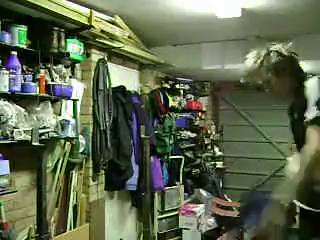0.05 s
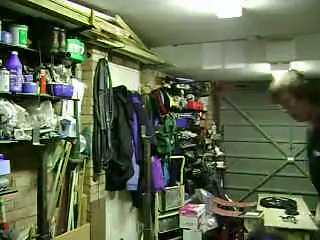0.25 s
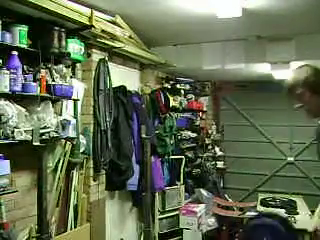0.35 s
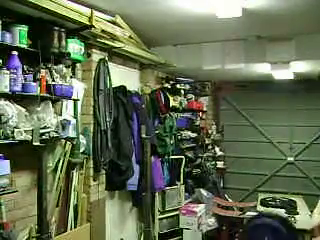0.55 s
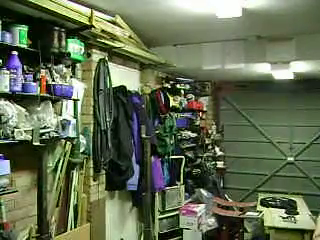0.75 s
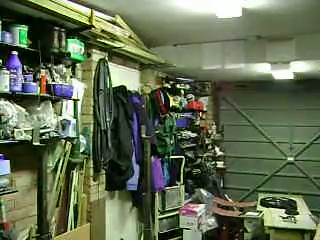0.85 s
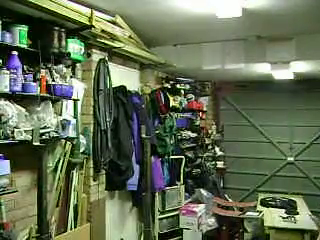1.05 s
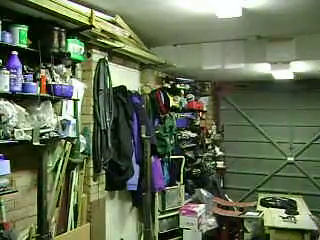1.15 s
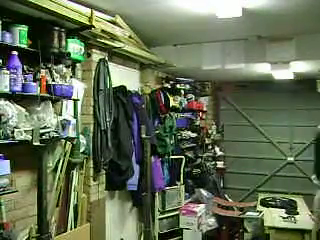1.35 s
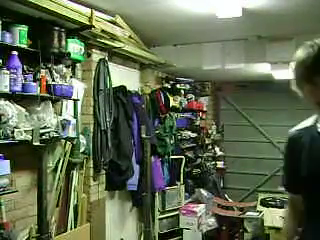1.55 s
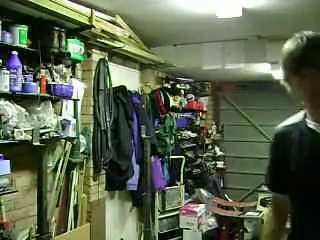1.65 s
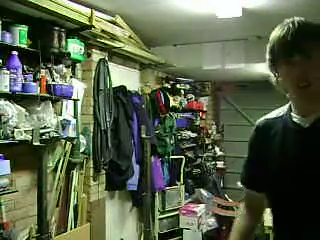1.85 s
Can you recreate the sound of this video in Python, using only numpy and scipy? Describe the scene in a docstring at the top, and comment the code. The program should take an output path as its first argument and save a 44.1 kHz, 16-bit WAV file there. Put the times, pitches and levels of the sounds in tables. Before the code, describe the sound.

A dropped barbell lands with a deep thud and a clatter of loose plates, crashes again as it bounces, and rattles to rest. The small garage adds a short echo, and the microphone overloads on the hardest hits.

```python
"""Faint air and electric hum in a small garage. Loose plates rattle on a loaded barbell's steel sleeves.
At 0.2 s the dropped bar lands: the floor thuds and booms, the plates knock, clatter and clank.
It bounces at 0.8 s, then more lightly until 1.4 s; the rattle dies out by about 1.7 s.
The room adds a short echo to the plates. The hardest crashes clip; treble is cut above about 5.5 kHz."""
import sys
import numpy as np
from scipy import signal
from scipy.fft import rfft, irfft, next_fast_len
from scipy.io import wavfile

SR = 44100
rng = np.random.default_rng(int(sys.argv[2]) if len(sys.argv) > 2 else 0)


def dump_mix(stems):
    """Bounce the given channels to the path in sys.argv[1] as a 16-bit WAV at rate SR."""
    frames = np.atleast_2d(stems).T  # one column per channel
    limited = np.clip(frames, -1, 1)  # hard clip at full scale
    pcm = np.round(limited * 32767).astype(np.int16)
    wavfile.write(sys.argv[1], SR, pcm)


N = 83790

# air spectrum: freq_hz, level_db
AIR_SPECTRUM = [(25, 11.5), (100, -5.5), (300, -6.5), (600, -10.5), (1700, -11), (2500, -23.5), (5300, -21)]
# electric hum: pitch_hz, rms_db
HUM_TONES = [(101, -50), (344.5, -53)]
# spells of plates shaking on the sleeves: start_s, hold_s, force_db, ring_offset_db
SHAKE_SPELLS = [(0, .03, -35, -6), (0.041, 0.14, -29.5, 3.5), (0.204, 0.11, -2, -6.5), (0.267, 0.1, 0, 1),
                (0.428, 0.042, -13, 2), (0.499, 0.096, -17, -1), (0.642, 0.061, -18.5, 4.5),
                (0.778, 0.022, -21, 4.5), (0.812, .05, -4, -5.5), (0.858, 0.064, -5.5, 2),
                (1.0, 0.12, -19.5, -3), (1.12, 0.12, -17.5, -3.5), (1.224, 0.05, -10, -1),
                (1.279, 0.062, -8, 0.5), (1.386, 0.098, -12.5, 2), (1.53, .12, -22, -1)]
# crack of a steel contact: freq_hz, level_db
CRACK_SPECTRUM = [(40, -12.5), (150, -4.5), (400, -4.5), (700, -2.5), (1000, 1.5), (1600, -5), (2500, 0.5),
                  (3500, -2.5), (5200, -3), (7000, -5)]
# bar and plate modes: pitch_hz, energy_db, t60_s
STEEL_MODES = [(847, -20.5, 0.028), (1072.4, -12.5, 0.047), (1137, -10, 0.034), (1214, -12, 0.042),
               (1515, -17.5, 0.14), (2119, -15, 0.033), (2844, -8.5, 0.046), (2983.6, -5.5, 0.051),
               (2958, -13, 0.26), (3042.6, -6.5, 0.052), (3407, -23, 0.12), (3804, -17.5, 0.047),
               (4690, -22, 0.022), (5283, -12, 0.071)]
# plate slams on collar: start_s, force_db
COLLAR_HITS = [(0.0425, -24), (.051, -25.5), (0.1352, -24), (.144, -19.5), (0.1738, -35), (0.2085, 9),
               (0.5335, -30), (0.5556, -17.5), (.574, -12.5), (0.5809, -7), (.61, -16.5), (0.6716, -27),
               (0.7089, -23.5), (.8121, -1), (0.8638, 15), (.922, -8), (.968, -14), (1.039, -22.5),
               (1.073, -17.5), (1.1074, -10.5), (1.1271, -8.5), (1.137, -12.5), (1.1584, -16.5),
               (1.171, -14), (1.2222, -1), (1.324, -3.5), (1.4008, -4.5), (1.4237, -9), (1.479, -18),
               (1.501, -11.5), (1.509, -11.5), (1.524, -11.5), (1.5452, -11.5), (1.6148, -17.5)]
# weights hit the floor: start_s, thud_db, boom_db, knock_db
FLOOR_HITS = [(.208, -2.5, 8.5, 7.5), (.805, -13.5, -20, -4), (.83, -11, -18.5, 2), (1.062, -30, -30, -16),
              (1.2185, -16.5, -25.5, -2.5), (1.254, -34, -31, -17), (1.425, -21, -34, -23)]
# low modes of floor and room: pitch_hz, level_db, t60_s
THUD_MODES = [(39.2, -6, 0.4), (69.7, 4.5, 0.34), (95.4, -5, 0.2), (130.2, -16.5, 0.66)]
# floor boom noise: freq_hz, level_db
BOOM_SPECTRUM = [(25, 4.5), (60, 2), (125, 0), (180, -3), (240, -1), (350, -4), (600, -5), (2000, -26)]
# floor panel modes: pitch_hz, level_db, t60_s
PANEL_MODES = [(38.3, -5.5, .4), (129.6, -8, 0.34), (224.9, -1.5, 0.24), (258, -1, 0.19)]
# hollow knock of plates on the floor: pitch_hz, level_db, t60_s
KNOCK_MODES = [(528, -6.5, 0.071), (635, 5.5, 0.022), (800, 4, 0.027), (1022, 0.5, 0.04), (1251, 1, 0.037)]
# lo-fi passband: freq_hz, gain_db
PASSBAND = [(20, -8.5), (40, 0.5), (5200, 0.5), (5600, -7.5), (5900, -9.5), (6200, -40), (6600, -70)]

AIR_RMS_DB = -42.5
ROOM_DELAY_S, ROOM_ATTACK_S, ROOM_T60_S = 0.0037, 0.0022, 0.26
CRACK_DB, CRACK_ATTACK_S, CRACK_T60_S = 2.5, 0.00085, 0.028
CRACK_DB_PER_FORCE_DB = 1.11  # harder contacts: more crack relative to ring
RING_DB, RING_SPREAD_DB, DETUNE_RATIO = -3.5, 0.56, 0.005
SHAKE_RISE_S, SHAKE_FALL_DB_PER_S = 0.011, 286
CONTACTS_PER_S, CONTACT_SPREAD_DB = 480, 3
THUD_ATTACK_S, KNOCK_ATTACK_S = 0.016, 0.0021
BOOM_ATTACK_S, BOOM_T60_S, PANEL_DB = 0.014, 0.27, -1
INPUT_LIMIT, OUTPUT_KNEE, OUTPUT_LIMIT, CUTOFF_HZ = 0.79, 0.57, 0.69, 15850


def amp(db):
    """Decibels to gain."""
    return 10 ** (np.asarray(db) / 20)


def unit_rms(x):
    """Scale to rms 1."""
    return x / np.sqrt(np.mean(x ** 2) + 1e-20)


def unit_energy(x):
    """Scale to energy 1."""
    return x / np.sqrt(np.sum(x ** 2) + 1e-20)


def filtered(x, response):
    """Apply the gain response(hz)."""
    size = next_fast_len(len(x) + 8192)
    return irfft(rfft(x, size) * response(np.fft.rfftfreq(size, 1 / SR)), size)[:len(x)]


def coloured(x, spectrum):
    """Apply (freq_hz, gain_db) points on a log frequency axis."""
    freq_hz, gain_db = np.transpose(spectrum)
    return filtered(x, lambda hz: amp(np.interp(np.log(hz + 1), np.log(freq_hz + 1), gain_db)))


def noise(spectrum, size):
    """Coloured noise, rms 1."""
    return unit_rms(coloured(rng.standard_normal(size), spectrum))


def struck(t, attack_s, t60_s):
    """Envelope of a blow at t = 0."""
    t = np.maximum(t, 0)
    return (1 - np.exp(-t / attack_s)) * amp(-60 * t / t60_s)


def room_tone():
    """Faint air and electric hum."""
    t = np.arange(N) / SR
    hum = sum(amp(db) * np.sqrt(2) * np.sin(2 * np.pi * hz * t) for hz, db in HUM_TONES)
    return amp(AIR_RMS_DB) * noise(AIR_SPECTRUM, N) + hum


def steel_ring(t):
    """Decaying modes of bar and plate; pitch and level vary from plate to plate."""
    out = np.zeros(len(t))
    for hz, db, t60_s in STEEL_MODES:
        detune, spread, phase = rng.standard_normal(3)
        partial = np.sin(2 * np.pi * (hz * (1 + DETUNE_RATIO * detune) * t + phase))
        out += amp(db - RING_SPREAD_DB * spread) * unit_energy(partial * amp(-60 * t / t60_s))
    return out


def garage_echo(x, wet_db):
    """Direct sound plus the short, diffuse echo of a cluttered room."""
    t = np.arange(SR // 2) / SR
    envelope = struck(t - ROOM_DELAY_S, ROOM_ATTACK_S, ROOM_T60_S)
    tail = unit_energy(rng.standard_normal(len(t)) * envelope)
    return x + amp(wet_db) * signal.fftconvolve(x, tail)[:len(x)]


def steel_contacts(crack_blows, ring_blows):
    """Each contact cracks and rings the steel; the room echoes."""
    t = np.arange(SR // 3) / SR
    crack = unit_energy(noise(CRACK_SPECTRUM, len(t)) * struck(t, CRACK_ATTACK_S, CRACK_T60_S))
    cracks = signal.fftconvolve(crack_blows, crack)
    rings = signal.fftconvolve(ring_blows, steel_ring(t))
    return garage_echo(amp(CRACK_DB) * cracks + amp(RING_DB) * rings, wet_db=-4.5)


def clatter(plates=8):
    """Loose plates strike the sleeves at random, as hard as they are shaken."""
    t = np.arange(N) / SR
    start_s, hold_s, force_db, ring_offset_db = np.transpose(SHAKE_SPELLS)[:, :, None]
    rise = np.clip((t - start_s) / SHAKE_RISE_S, 0, 1)
    fall_db = SHAKE_FALL_DB_PER_S * np.maximum(t - start_s - hold_s, 0)
    spells = amp(force_db - fall_db) * rise
    crack_gain = np.linalg.norm(spells, axis=0) ** CRACK_DB_PER_FORCE_DB
    ring_gain = np.linalg.norm(spells * amp(ring_offset_db), axis=0)
    contacts = rng.random((plates, N)) < CONTACTS_PER_S / plates / SR
    strengths = amp(CONTACT_SPREAD_DB * rng.standard_normal((plates, N)))
    out = np.zeros(N)
    for blows in map(unit_rms, contacts * strengths):
        out += steel_contacts(blows * crack_gain, blows * ring_gain)[:N]
    return out / np.sqrt(plates)


def clanks():
    """Single hard blows of plate on collar."""
    out = np.zeros(N + SR)
    blow = np.sqrt([0.004 * SR])  # impulse with the energy of 4 ms at rms 1
    for start_s, force_db in COLLAR_HITS:
        clank = steel_contacts(blow * amp(force_db * CRACK_DB_PER_FORCE_DB), blow * amp(force_db))
        out[round(start_s * SR):][:len(clank)] += clank
    return out[:N]


def struck_modes(t, modes, attack_s):
    """Damped modes excited together at t = 0."""
    return sum(amp(db) * np.sin(2 * np.pi * hz * t) * struck(t, attack_s, t60_s)
               for hz, db, t60_s in modes)


def landings():
    """Each landing drives a deep thud, a floor boom and a hollow knock of the plates."""
    out = np.zeros(N)
    for start_s, thud_db, boom_db, knock_db in FLOOR_HITS:
        age_s = np.arange(N) / SR - start_s
        out += amp(thud_db) * struck_modes(age_s, THUD_MODES, THUD_ATTACK_S)
        out += amp(boom_db) * noise(BOOM_SPECTRUM, N) * struck(age_s, BOOM_ATTACK_S, BOOM_T60_S)
        out += amp(boom_db + PANEL_DB) * struck_modes(age_s, PANEL_MODES, BOOM_ATTACK_S)
        out += amp(knock_db) * garage_echo(struck_modes(age_s, KNOCK_MODES, KNOCK_ATTACK_S), wet_db=1)
    return out


def scene():
    """Barbell in the garage, mono."""
    return (room_tone() + clatter() + landings() + clanks())[None]


def record(dry):
    """Lo-fi chain: hard limit, narrow band, soft limit, low-pass."""
    narrow = coloured(np.clip(dry[0], -INPUT_LIMIT, INPUT_LIMIT), PASSBAND)
    headroom = OUTPUT_LIMIT - OUTPUT_KNEE
    below_knee = np.clip(narrow, -OUTPUT_KNEE, OUTPUT_KNEE)
    rounded = below_knee + headroom * np.tanh((narrow - below_knee) / headroom)
    return filtered(rounded, lambda hz: hz < CUTOFF_HZ)[None]


dry = scene()
out = record(dry)
dump_mix(out)
```